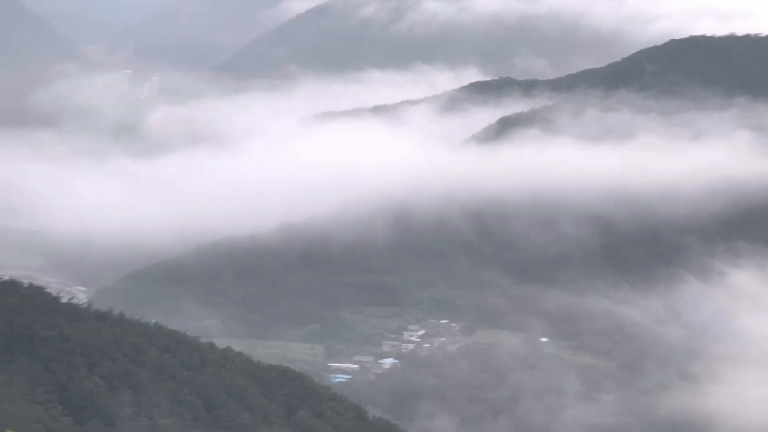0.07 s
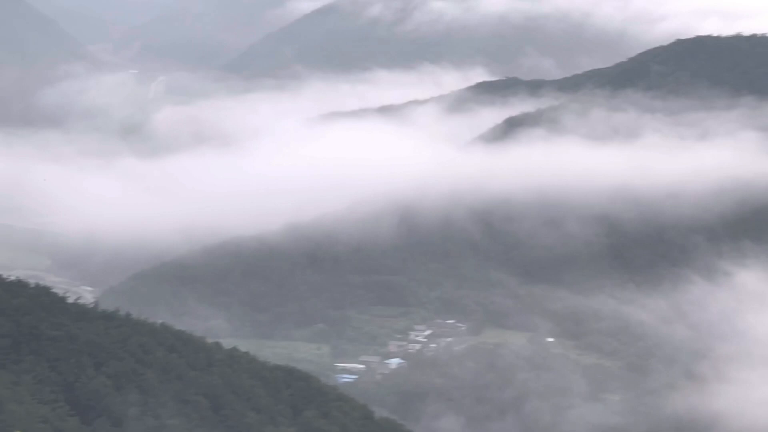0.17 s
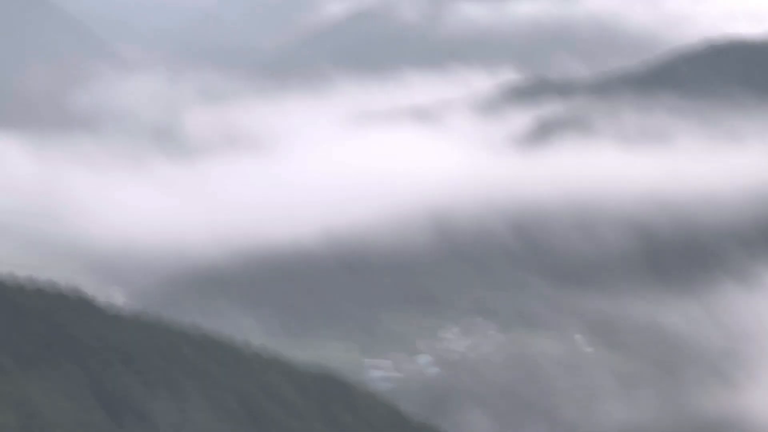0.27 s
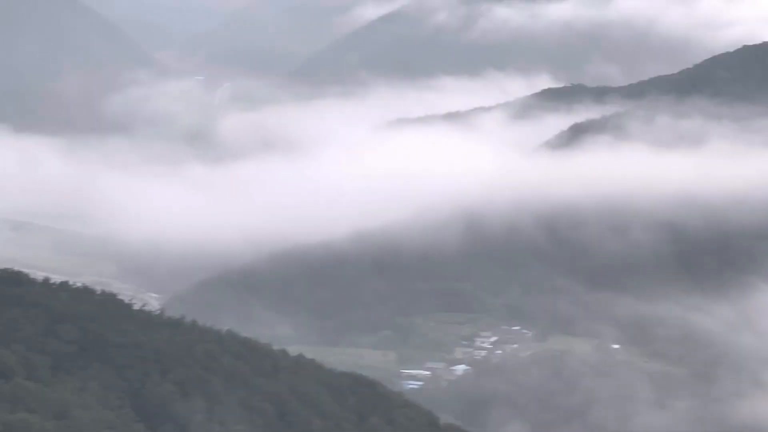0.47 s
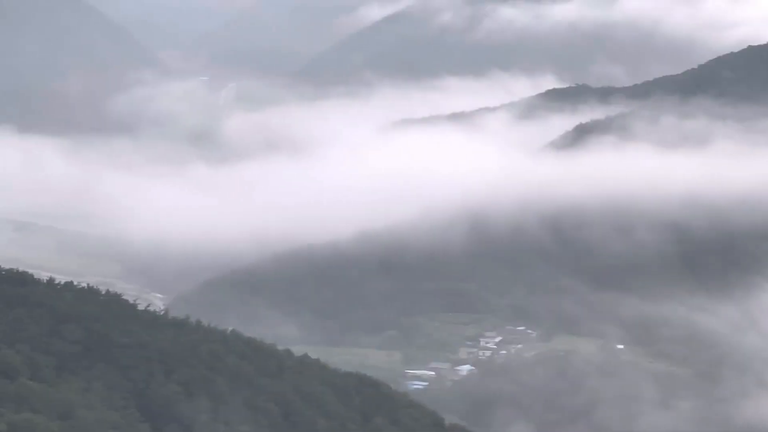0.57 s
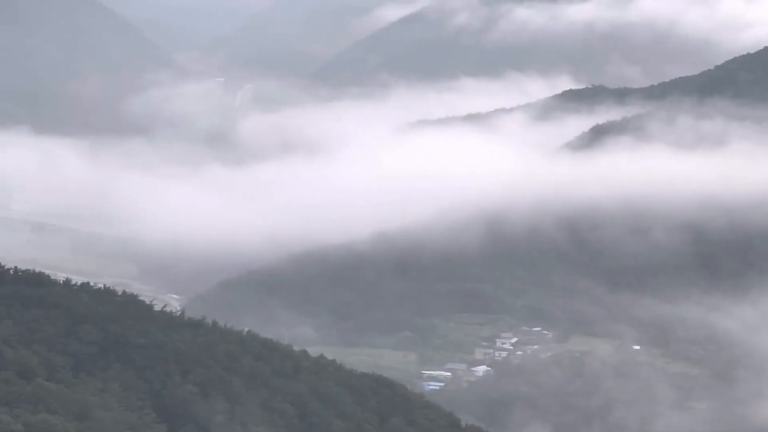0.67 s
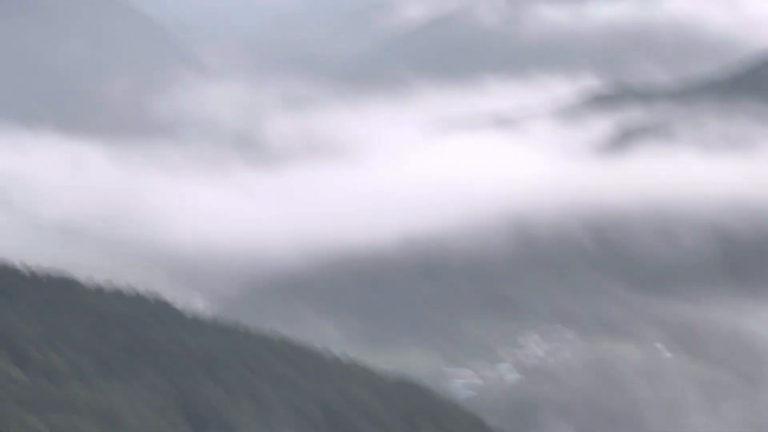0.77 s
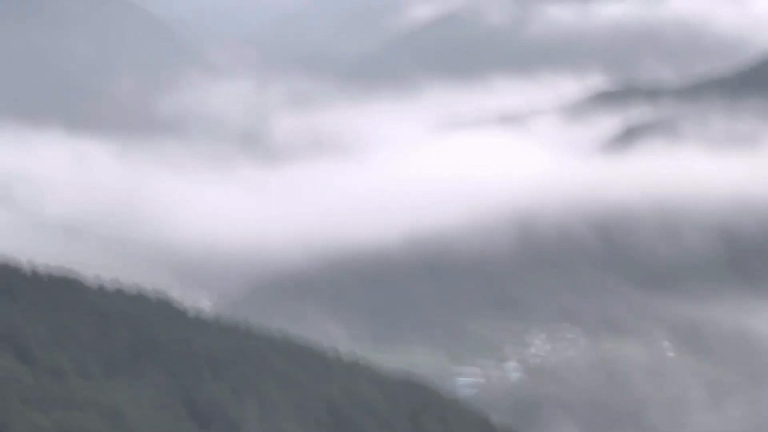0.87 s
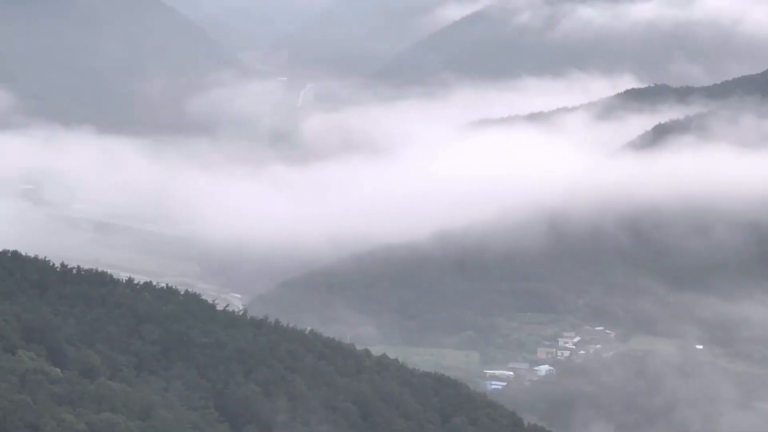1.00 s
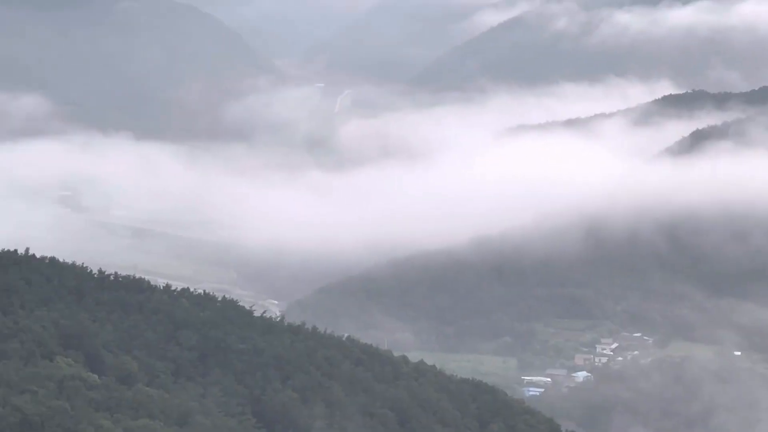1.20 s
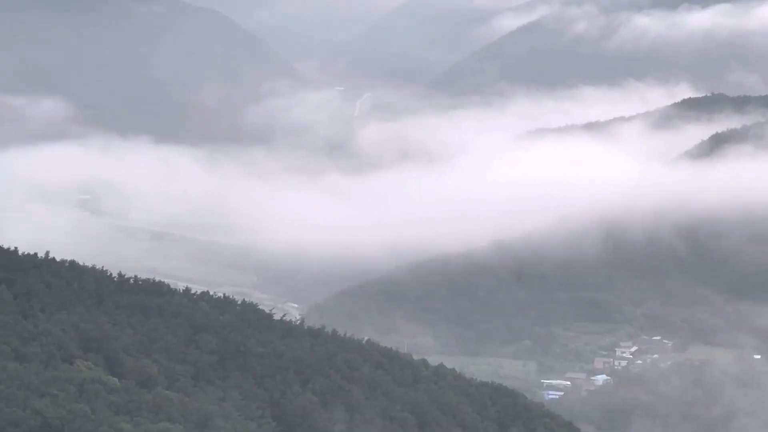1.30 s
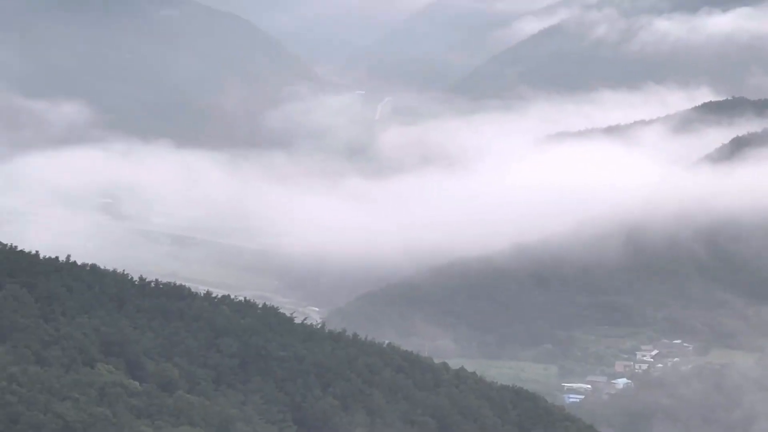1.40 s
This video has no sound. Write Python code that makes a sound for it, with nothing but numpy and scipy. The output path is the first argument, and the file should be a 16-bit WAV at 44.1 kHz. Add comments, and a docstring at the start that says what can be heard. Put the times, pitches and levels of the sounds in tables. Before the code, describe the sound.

Two low, slightly raspy hoots from a bird stand out in a mountain valley, each sinking a little at its end. High crickets pulse behind them and carry on afterwards, along with distant insects and a gentle hiss.

```python
"""Hoots and crickets in a valley

A bird hoots twice, low and almost pure; a fast flutter in its throat modulates level and pitch, and
smooths out as each note sinks. Three crickets trill in trains of scraped pulses at slightly different
rates, over a far insect chorus, the low rumble of the valley and a soft hiss. The recorder adds a
faint high whistle, a pair of sidebands that follows the hoots."""
import sys
import numpy as np
from scipy import signal
from scipy.fft import rfft, irfft, next_fast_len
from scipy.io import wavfile
from scipy.ndimage import map_coordinates

SR = 44100
rng = np.random.default_rng(int(sys.argv[2]) if len(sys.argv) > 2 else 0)


def generate_wav(signal):
    """Clip the signal to [-1, 1] and save it as 16-bit WAV at the path in sys.argv[1]."""
    frames = np.transpose(np.atleast_2d(signal))
    scaled = np.clip(frames, -1, 1) * 32767
    pcm = np.round(scaled).astype(np.int16)
    wavfile.write(sys.argv[1], SR, pcm)


N = 63945
t = np.arange(N) / SR


# Contour of each hoot: time_s, pitch_hz, level_db
HOOT_CONTOURS = [
    [(.125, 484.8, -68), (.18, 483, -53.5), (.194, 476, -42.5), (.208, 479.8, -27), (.285, 477.7, -26.5),
     (.33, 482, -26), (.425, 467.8, -27), (.455, 457.5, -34), (.495, 475, -52.5), (.53, 454, -69.5)],
    [(.62, 481.9, -68.5), (.68, 484.4, -58), (.698, 473.7, -44), (.714, 467.1, -27.5), (.745, 479.2, -26.5),
     (.8, 474, -26.5), (.843, 458, -29), (.86, 480, -39), (.882, 452, -62)],
]
# Span of full flutter in each hoot: start_s, end_s
FLUTTER_SPANS = [(0.207, .385), (0.711, .795)]
# Brief catches in the voice: time_s, level_drop_db, pitch_drop_hz
VOICE_CATCHES = [(0.302, 7, 58.6), (.727, 1.5, 8), (.792, 3.5, 40)]
# Harmonics above the fundamental: multiple, relative_level_db
HARMONICS = [(2, -41.5), (3, -44.5)]
def hoots():
    """Amplitude and frequency modulation: throat flutter shakes a near sine. Yields each tone and rasp."""
    flutter_hz, swing_hz, swing_db, pitch_lead_rad = 96.5, 11.5, 1.55, 1.34
    rate_jitter, fade_s, smooth_depth, catch_s = .017, .0067, .3, .0034
    for contour, (start_s, end_s) in zip(HOOT_CONTOURS, FLUTTER_SPANS):
        time_s, contour_hz, contour_db = np.transpose(contour)
        flutter = running_phase(flutter_hz * (1 + rate_jitter * wobble(60)))
        flutter -= np.interp(start_s, t, flutter)
        inside_s = np.minimum(t - start_s, end_s - t)
        depth = smooth_depth + (1 - smooth_depth) * np.clip(inside_s / fade_s + .5, 0, 1)
        pitch_hz = np.interp(t, time_s, contour_hz) + swing_hz * depth * np.cos(flutter + pitch_lead_rad)
        level_db = np.interp(t, time_s, contour_db, left=-120, right=-120)
        level_db += swing_db * depth * np.cos(flutter)
        for when_s, drop_db, drop_hz in VOICE_CATCHES:
            dip = np.exp(-.5 * ((t - when_s) / catch_s) ** 2)
            pitch_hz -= drop_hz * dip
            level_db -= drop_db * dip
        phase = running_phase(pitch_hz)
        tone = np.sin(phase) + sum(amp(db) * np.sin(multiple * phase) for multiple, db in HARMONICS)
        yield np.sqrt(2) * amp(level_db) * tone, rasp(level_db, depth)


# Spectrum of the rasp: frequency_hz, relative_density_db
RASP_SPECTRUM = [(250, -41), (380, 0.5), (540, 9.5), (650, -12), (760, -10.5), (920, -13), (1050, -24.5),
                 (1250, -38.5), (1500, -16.5), (1750, -37), (3000, -68.5)]
# Stereo width of the rasp: frequency_hz, side_over_mid_db
RASP_WIDTH = [(400, -10.5), (600, -17), (750, -7), (1000, -4.5), (1400, -25.5)]
def rasp(voice_db, flutter_depth):
    """Power-law growth: diffuse noise rises with vocal effort, more slowly than the tone does."""
    full_voice_db, offset_db, exponent = -29.5, -15.5, .68
    level_db = full_voice_db + offset_db + exponent * (voice_db - full_voice_db)
    return amp(level_db) * np.sqrt(flutter_depth) * stereo_noise(RASP_SPECTRUM, RASP_WIDTH)


def bird():
    """Interaural level and phase differences set the bird to the left. Also returns its complex voice."""
    tones, rasps = zip(*hoots())
    voice = signal.hilbert(sum(tones))
    return pan(.9) * phase_pair(voice, left_lead_rad=.2) + pan(3.5) * sum(rasps), voice


# Images of the voice about a high tone: carrier_hz, side (-1 below, +1 above), gain_db
SIDEBANDS = [(10080, -1, -39), (10088, 1, -47)]
def whistle(voice):
    """Heterodyning: the recorder's whistle is the voice mirrored about a high tone, flickering fast."""
    images = sum(amp(gain_db) * voice * np.exp(2j * np.pi * np.sign(side) * carrier_hz * t)
                 for carrier_hz, side, gain_db in SIDEBANDS)
    flicker_db = 2 * wobble(500)
    return phase_pair(images * amp(flicker_db), left_lead_rad=1.4)


# Wing rhythm of each cricket: first_stroke_s, stroke_rate_hz
WING_RHYTHMS = [(.0155, 23.98), (.0275, 26.22), (.009, 24.66)]
# Wing stroke of each cricket: pitch_hz, fall_hz, length_s
WING_TONES = [(6295, 70, 0.017), (6537, 98, 0.017), (5805, 330, 0.022)]
# Levels of the three crickets: time_s, first_db, second_db, third_db
TRILL_LEVELS = [(0, -44.5, -73, -56), (.15, -44.5, -60.5, -61.5), (.4, -49, -53.5, -59.5),
                (.65, -49, -52, -57.5), (.95, -50, -54, -58), (1.25, -53, -57, -58.5),
                (1.45, -47, -57, -60)]
def crickets():
    """Superposition: three pulse trains of unequal rate drift in and out of step."""
    time_s, *levels_db = np.transpose(TRILL_LEVELS)
    return sum(amp(np.interp(t, time_s, level_db)) * stridulation(*rhythm, *tone)
               for rhythm, tone, level_db in zip(WING_RHYTHMS, WING_TONES, levels_db))


def stridulation(first_stroke_s, stroke_rate_hz, pitch_hz, fall_hz, length_s):
    """Stridulation: each wing stroke scrapes out a short tone that falls in pitch."""
    detune_hz, timing_scatter_s, scrape_hz = 12.71, .00087, 52.7
    stroke = np.round((t - first_stroke_s) * stroke_rate_hz).astype(int)
    detune, lateness = rng.standard_normal((128, 2))[stroke % 128].T
    centre_s = first_stroke_s + stroke / stroke_rate_hz + timing_scatter_s * lateness
    position = np.clip((t - centre_s) / length_s, -.5, .5)
    phase = running_phase(pitch_hz + detune_hz * detune - fall_hz * position + scrape_hz * wobble(500))
    return np.sqrt(2) * np.cos(np.pi * position) * np.sin(phase)


# Spectrum of the far insects: frequency_hz, relative_density_db
CHORUS_SPECTRUM = [(4800, -46.5), (5450, -20), (5850, -3.5), (6050, -1), (6350, 1), (6580, 0), (6750, -19),
                   (7400, -23), (8000, -58)]
# Stereo width of the chorus, rumble, hiss and air: frequency_hz, side_over_mid_db
BACKGROUND_WIDTH = [(50, -18.5), (200, -14.5), (640, -3.5), (1300, -6), (2000, -46), (3100, -35),
                    (4000, -46), (6500, -47.5), (9500, -18), (12500, -25.5), (13500, -7), (15500, 4)]
def insect_chorus():
    """Incoherent summation: many far insects merge into one band of noise."""
    return amp(-55) * stereo_noise(CHORUS_SPECTRUM, BACKGROUND_WIDTH)


# Spectrum of the valley's rumble: frequency_hz, relative_density_db
RUMBLE_SPECTRUM = [(20, -29.5), (35, -15.5), (52, -5), (100, -6), (160, -5), (195, -4.5), (225, -13.5),
                   (258, -6.5), (300, -17), (450, -16), (620, -20.5), (900, -26.5), (1300, -27.5),
                   (2000, -59.5)]
def valley():
    """Random modulation spreads a far hum into a narrow band, heard within a low rumble."""
    hum_hz, waver_hz, waver_db = 186.8, 4.05, 2
    hum = unit_rms(amp(waver_db * wobble(20)) * np.sin(running_phase(hum_hz + waver_hz * wobble(18))))
    rumble = stereo_noise(RUMBLE_SPECTRUM, BACKGROUND_WIDTH)
    return pan(1.5) * (amp(-58.5) * rumble + amp(-63) * hum)


# Spectrum of the hiss: frequency_hz, relative_density_db
HISS_SPECTRUM = [(300, -20.5), (1200, -24.5), (1550, -8), (2000, -11), (3000, -3), (4000, 0), (4700, -1.5),
                 (5300, -10.5), (6800, -6.5), (7550, -13), (7850, -34.5), (8400, -57)]
# Swell of the hiss: time_s, gain_db
HISS_ENVELOPE = [(0, 0), (.11, .6), (.3, 0.2), (.5, 0.7), (.88, -0.2), (.96, 1.2), (1.04, 2), (1.12, -0.2),
                 (1.2, 0.35), (1.45, 0.5)]
def hiss():
    """Slow amplitude modulation makes broadband noise swell gently."""
    swell_db = np.interp(t, *np.transpose(HISS_ENVELOPE)) + .82 * wobble(20)
    return amp(-57.5 + swell_db) * stereo_noise(HISS_SPECTRUM, BACKGROUND_WIDTH)


# Spectrum of the airy treble: frequency_hz, relative_density_db
AIR_SPECTRUM = [(8000, -51), (8800, -31.5), (8950, 2), (10000, 0), (11500, -1), (12600, 5.5), (14000, 5),
                (15600, 2.5)]
# Spectrum of the band in antiphase between the ears: frequency_hz, relative_density_db
ANTIPHASE_SPECTRUM = [(7000, -37), (7500, -10.5), (7750, -4.5), (8300, 2.5), (9000, -10.5), (9700, -16.5),
                      (10500, -16), (11000, -53.5)]
def air():
    """Interaural decorrelation: thin treble noise sounds wide where the two ears receive it unalike."""
    treble = stereo_noise(AIR_SPECTRUM, BACKGROUND_WIDTH)
    antiphase = noise(ANTIPHASE_SPECTRUM) * np.array([[1], [-1]])
    return amp(-67) * treble + amp(-69.5) * antiphase


# Faint whines within the hiss: pitch_hz, level_db
WHINE_TONES = [(5152, -78.5), (5516, -78)]
def whines():
    """Slight frequency modulation lets two sines of steady level wander in pitch."""
    drift_hz = 5
    return sum(np.sqrt(2) * amp(level_db) * np.sin(running_phase(pitch_hz + drift_hz * wobble(4.2)))
               for pitch_hz, level_db in WHINE_TONES)


def amp(db):
    """Amplitude ratio from decibels."""
    return 10 ** (np.asarray(db) / 20)


def unit_rms(x):
    """Normalisation to unit power."""
    return x / np.sqrt(np.mean(x ** 2) + 1e-20)


def running_phase(hz):
    """Phase is the time integral of frequency."""
    return 2 * np.pi * np.cumsum(hz) / SR


def wobble(rate_hz):
    """Spline interpolation joins rate_hz random values a second into a smooth curve."""
    return map_coordinates(rng.standard_normal(int(N * rate_hz / SR) + 4), [t * rate_hz])


def filtered(x, response):
    """Linear filtering multiplies the spectrum by a frequency response."""
    size = next_fast_len(N + 8192)
    return irfft(rfft(x, size) * response(np.fft.rfftfreq(size, 1 / SR)), size)[..., :N]


def shaped(x, curve):
    """Spectral shaping by a decibel curve, interpolated over log frequency."""
    frequency_hz, gain_db = np.transpose(curve)
    return filtered(x, lambda hz: amp(np.interp(np.log(hz + 1), np.log(frequency_hz + 1), gain_db)))


def noise(spectrum):
    """Filtering colours white noise; the result has unit power."""
    return unit_rms(shaped(rng.standard_normal(N), spectrum))


def stereo_noise(spectrum, width):
    """Mid-side stereo: an independent side signal sets the width at each frequency."""
    mid, side = noise(spectrum), shaped(noise(spectrum), width)
    return np.array([mid + side, mid - side])


def pan(left_over_right_db):
    """Interaural level difference as a pair of gains."""
    return amp(np.array([[left_over_right_db], [-left_over_right_db]]) / 2)


def phase_pair(complex_tone, left_lead_rad):
    """Interaural phase difference turns a complex tone into a stereo pair."""
    return np.real(complex_tone * np.exp(.5j * np.array([[left_lead_rad], [-left_lead_rad]])))


def scene():
    """Superposition: all the layers add linearly."""
    calls, voice = bird()
    return calls + whistle(voice) + crickets() + insect_chorus() + valley() + hiss() + air() + whines()


def record(dry):
    """Band limiting: the recorder keeps nothing above its cutoff."""
    cutoff_hz = 15700
    return filtered(dry, lambda hz: hz < cutoff_hz)


dry = scene()
out = record(dry)
generate_wav(out)
```